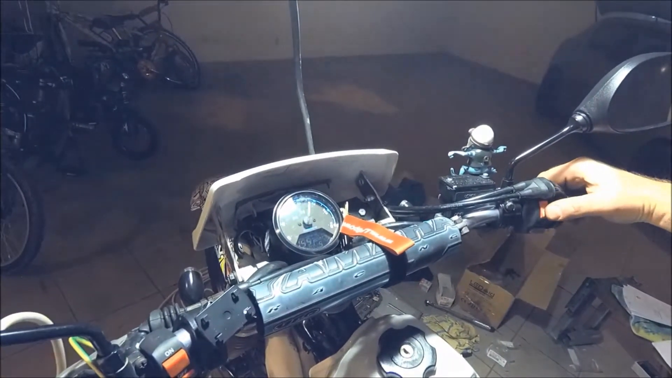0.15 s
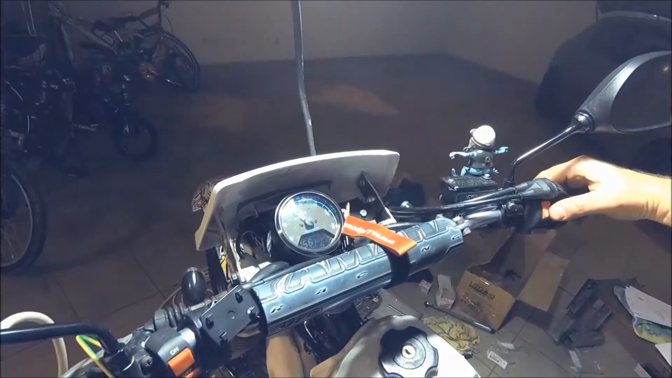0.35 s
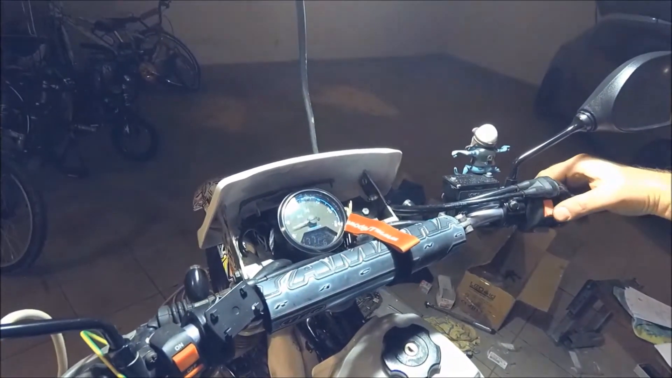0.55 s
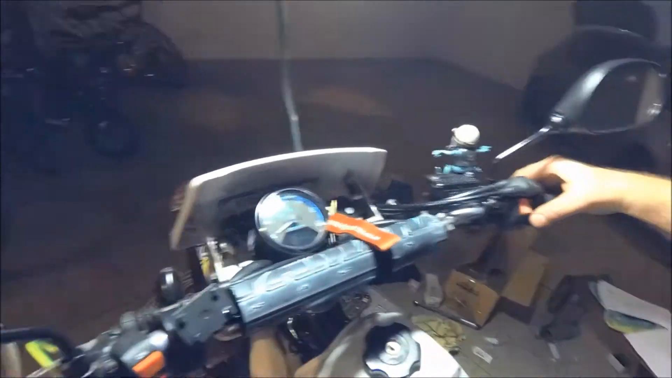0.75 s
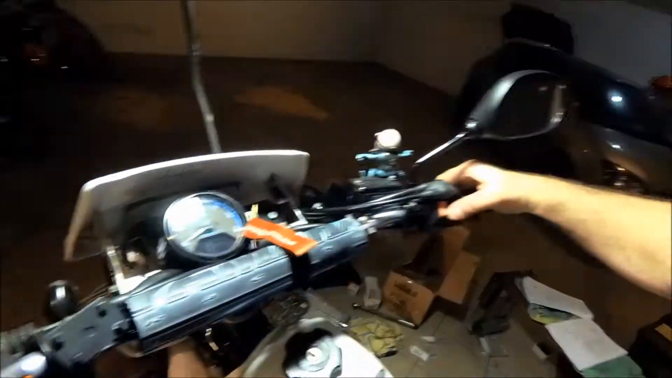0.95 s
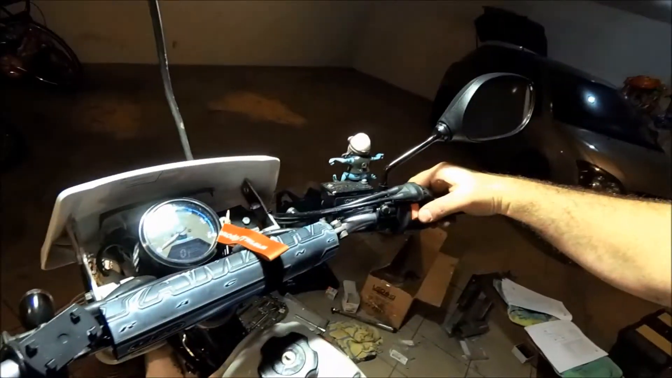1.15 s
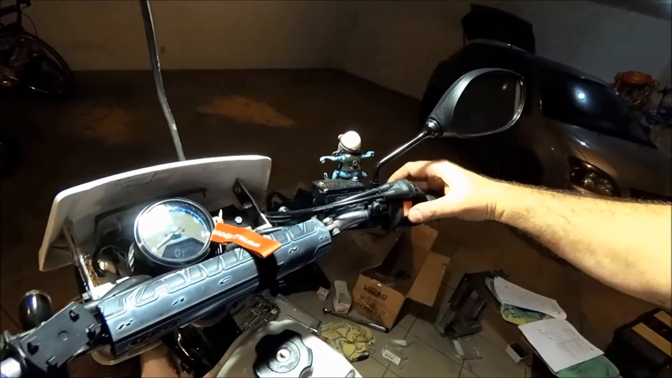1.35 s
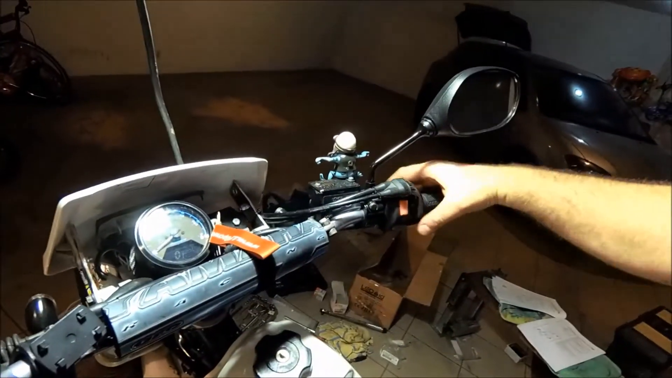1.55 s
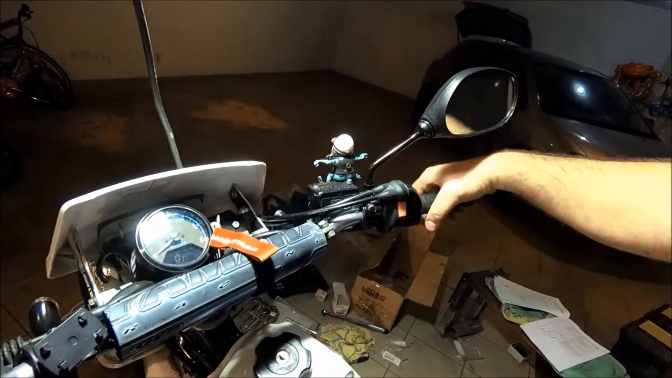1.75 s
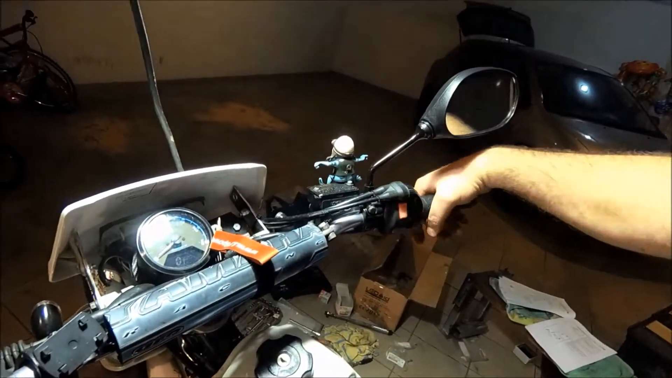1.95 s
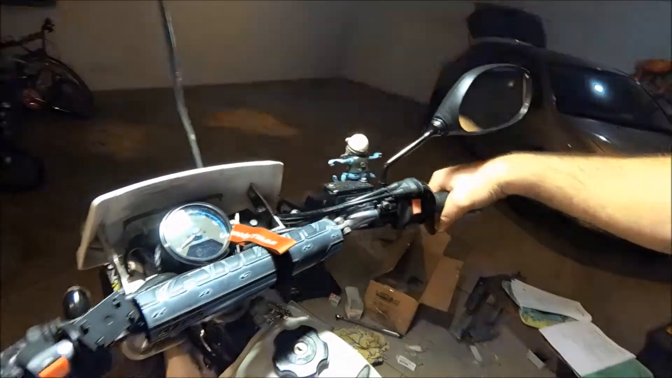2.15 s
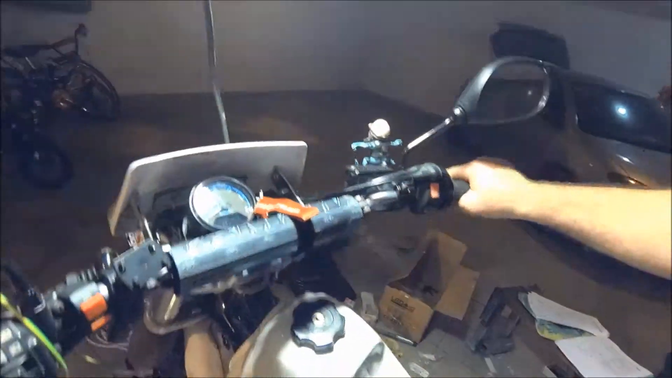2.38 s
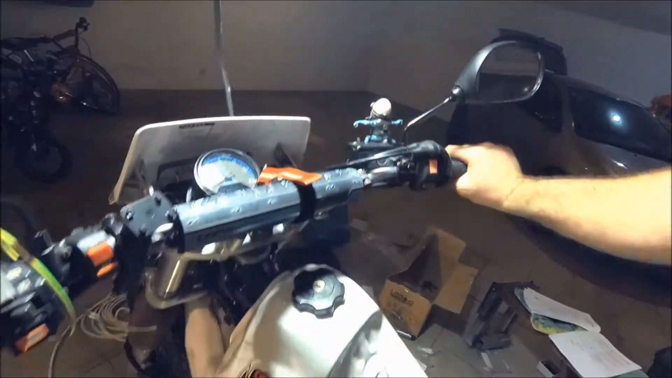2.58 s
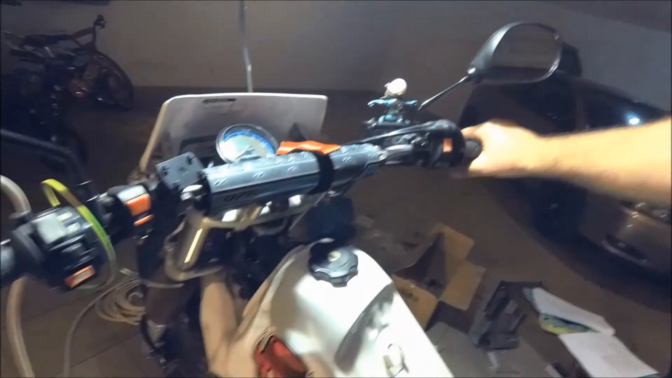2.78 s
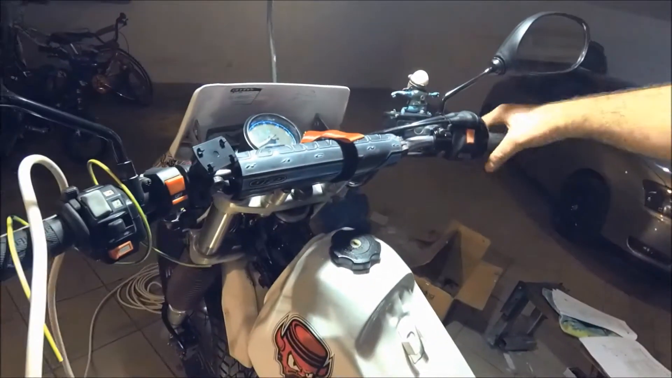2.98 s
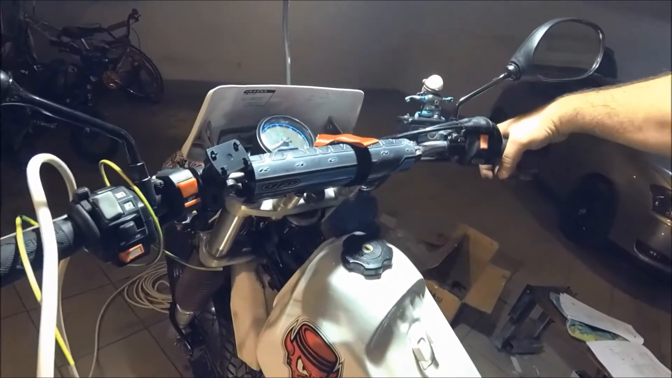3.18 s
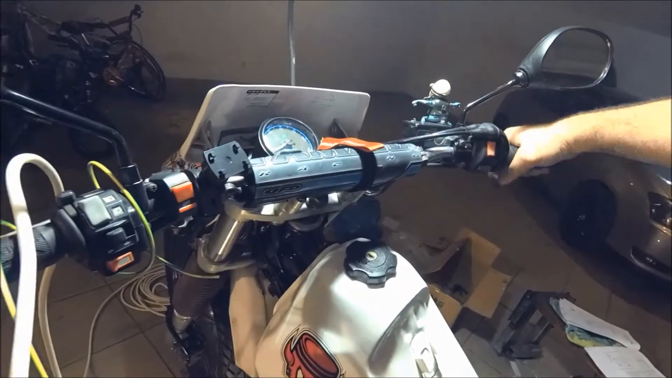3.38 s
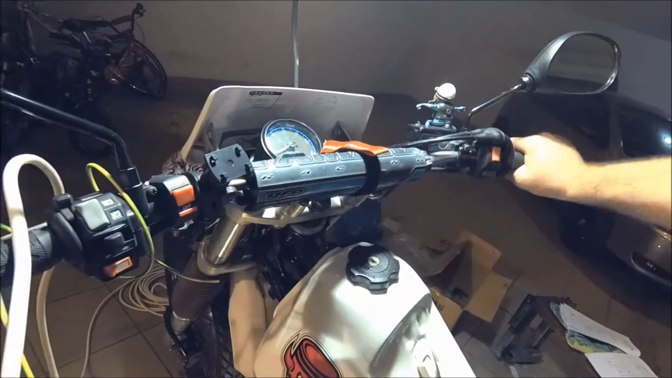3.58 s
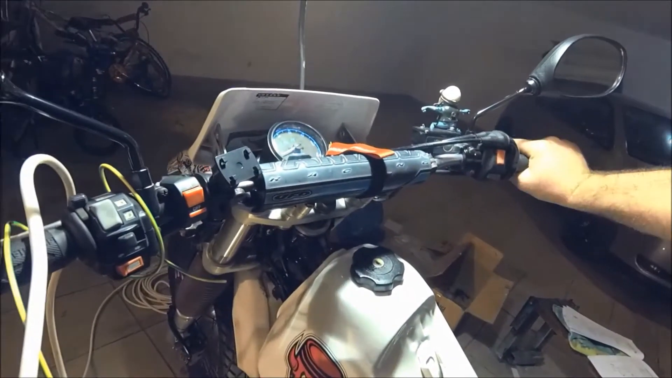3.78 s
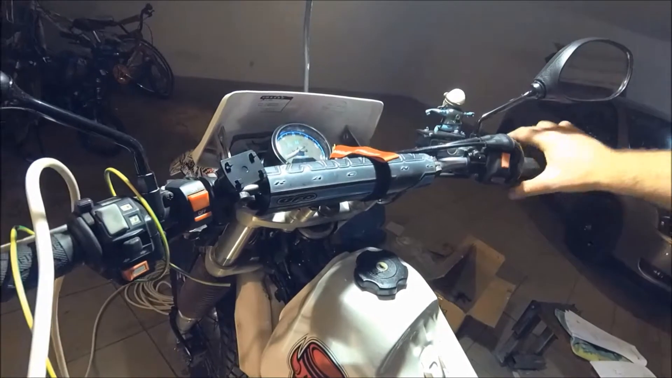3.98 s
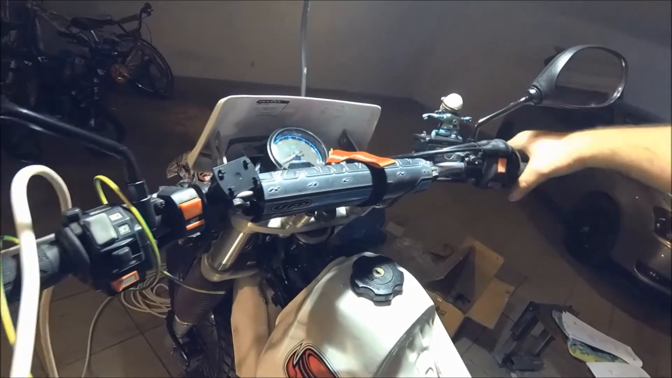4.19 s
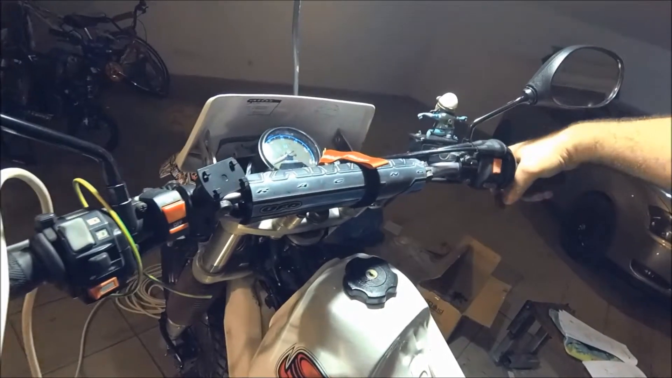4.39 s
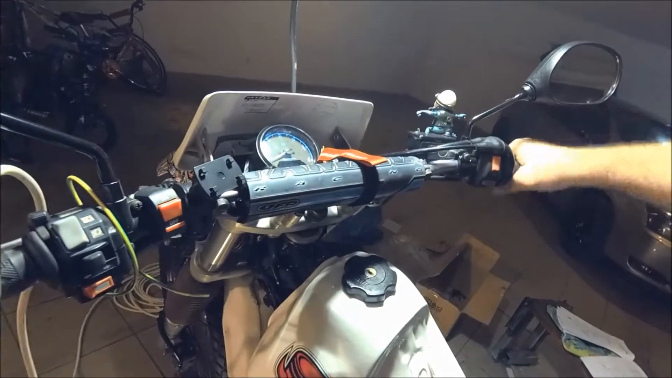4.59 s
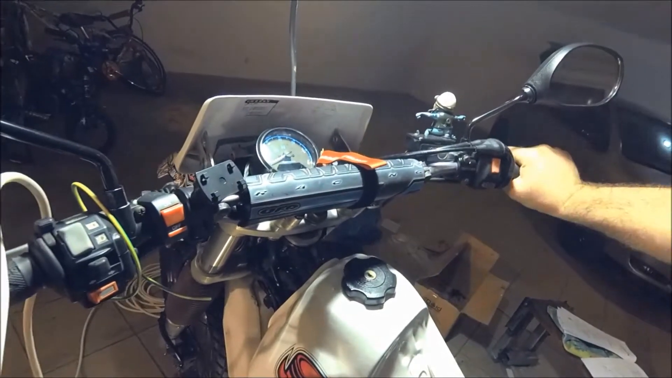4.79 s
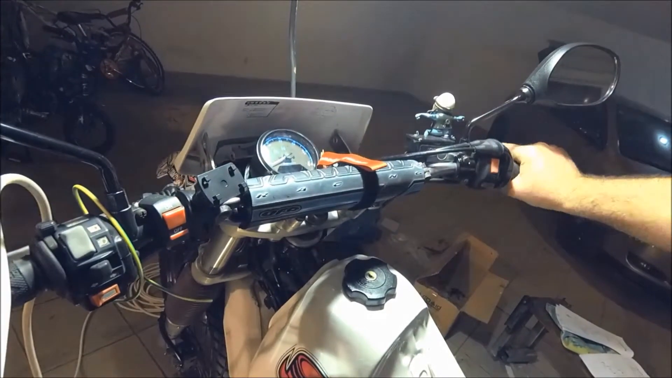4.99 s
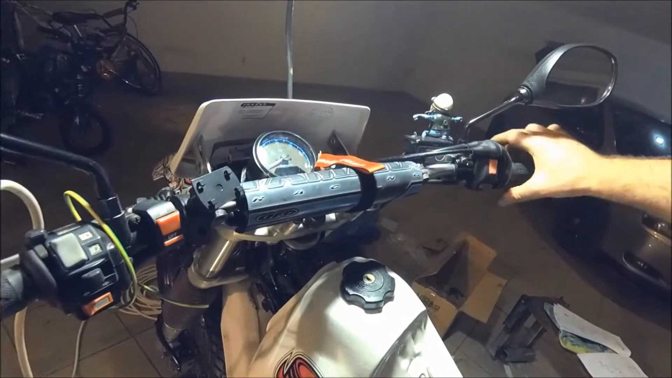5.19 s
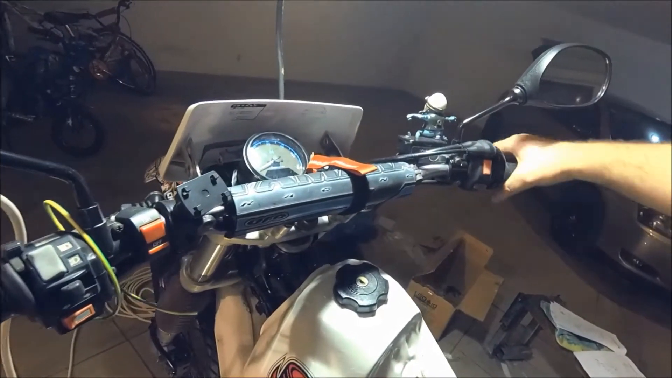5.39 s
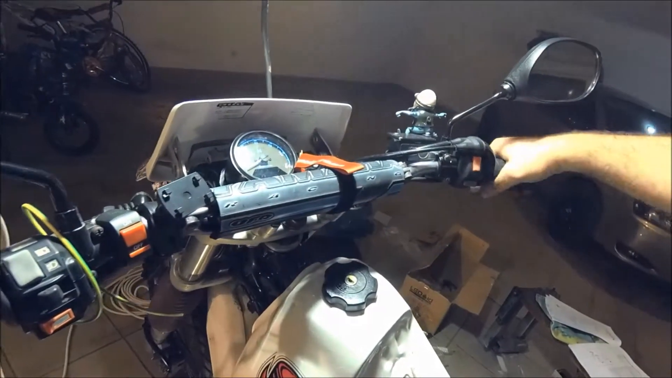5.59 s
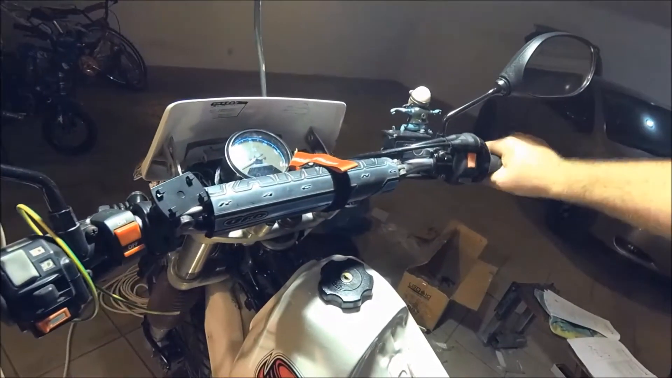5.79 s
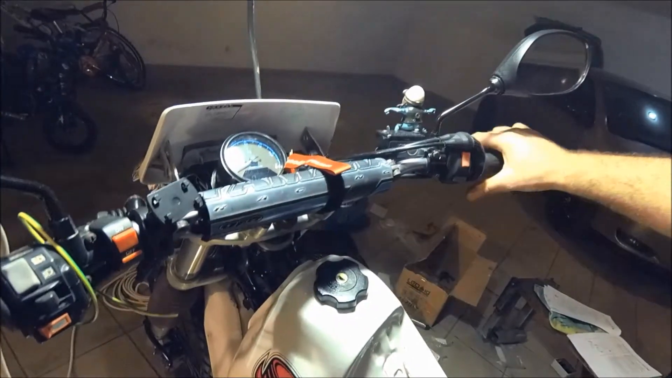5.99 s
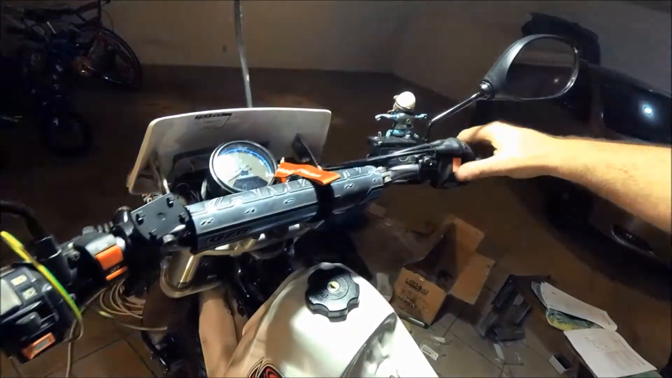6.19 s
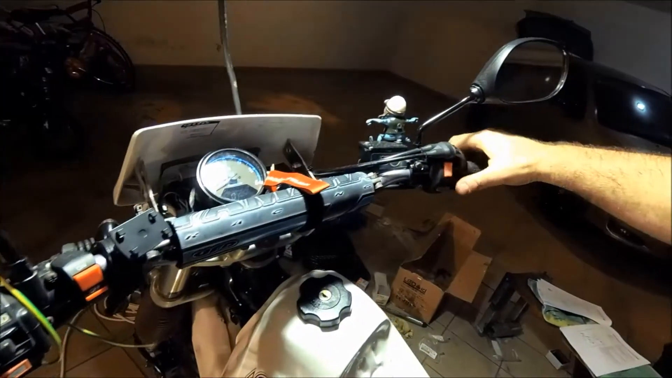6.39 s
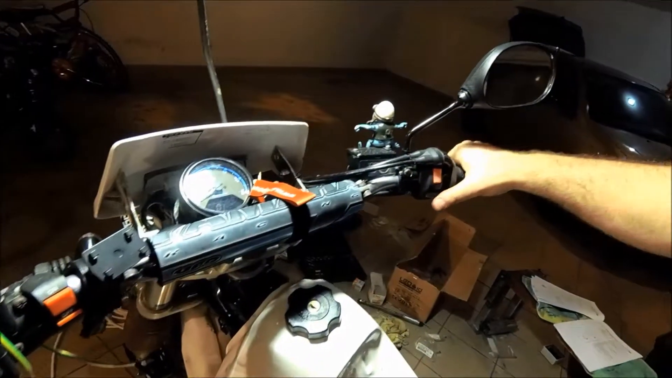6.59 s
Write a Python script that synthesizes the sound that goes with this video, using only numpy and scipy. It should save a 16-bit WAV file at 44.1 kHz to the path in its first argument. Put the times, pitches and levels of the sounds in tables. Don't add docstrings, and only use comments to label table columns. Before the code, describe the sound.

One hard metallic lever snap, then four throttle-grip slams about a second apart, ringing in a bare concrete garage over faint hiss and distant traffic.

```python
import sys
import numpy as np
from scipy import signal
from scipy.fft import rfft, irfft, next_fast_len
from scipy.io import wavfile
from scipy.ndimage import uniform_filter1d, map_coordinates

SR = 44100
rng = np.random.default_rng(int(sys.argv[2]) if len(sys.argv) > 2 else 0)


def invert_db(level):
    return 10 ** (np.asarray(level, dtype=float) / 20)


def materialize(psi):
    bounded = np.clip(np.atleast_2d(psi).T, -1, 1)
    quanta = np.round(bounded * 32767).astype(np.int16)
    wavfile.write(sys.argv[1], SR, quanta)


N = 293286
SPAN, SHORT, BRIEF = SR, SR // 2, SR // 8


def unit(x):
    return x / np.sqrt(np.mean(x ** 2) + 1e-20)


def along(points, hz):
    f, v = np.transpose(points)
    return np.interp(np.log(hz + 1), np.log(f + 1), v)


def curves(rows):
    s, *cols = np.transpose(rows)
    return [np.interp(np.arange(N) / SR, s, c) for c in cols]


def wobble(rate):
    return map_coordinates(rng.standard_normal(200), [np.arange(N) * rate / SR])


def filtered(x, response):
    m = next_fast_len(x.shape[-1] + BRIEF)
    return irfft(rfft(x, m) * response(np.fft.rfftfreq(m, 1 / SR)), m)[..., :x.shape[-1]]


def resonant(x, modes):
    def response(f):
        total = 0
        for k, (centre, width, db) in enumerate(modes):
            damping = 1j * f * width
            total = total + (-1) ** k * invert_db(db) * damping / (centre * centre - f * f + damping)
        return total
    return filtered(x, response)


def paired(two, alike):
    def mixing(hz):
        turn = np.arccos(np.clip(along(alike, hz), -1, 1)) / 2
        return np.array([np.cos(turn), np.sin(turn)])
    mid, side = filtered(two, mixing)
    return np.array([mid + side, mid - side])


def rush(spectrum, alike):
    noise = filtered(rng.standard_normal((2, N)), lambda hz: invert_db(along(spectrum, hz)))
    return unit(paired(noise, alike))


def burst(*contacts):
    shape = np.zeros(BRIEF)
    for delay, db, t60, attack in contacts:
        t = np.maximum(np.arange(BRIEF) / SR - delay, 0)
        shape += invert_db(db - 60 * t / t60) * (1 - np.exp(-t / attack))
    z = rfft(rng.standard_normal(BRIEF) * shape)
    even = irfft(z / np.sqrt(uniform_filter1d(np.abs(z) ** 2, size=9)), BRIEF)
    return even * shape / np.sqrt(np.abs(uniform_filter1d(even ** 2, size=40)) + 1e-12)


def peaked(x, db, tilt_db=0):
    x = filtered(x, lambda hz: invert_db(tilt_db * np.log2((hz + 300) / 5000)))
    return invert_db(db) * x / np.abs(x).max()


# frequency_hz, density_db
HISS = [(12, -58.5), (20, -25), (117, -12), (174, -2), (244, -5), (351, -6.5), (382, -12.5), (415, -8),
        (452, -11.5), (535, -10.5), (689, -15), (1310, -19.5), (3930, -20), (14700, -17.5), (16500, -32)]
# frequency_hz, likeness
HISS_ALIKE = [(60, 0.51), (240, 0.34), (950, -0.17), (3770, -0.22), (15000, 0.054)]


def microphone_hiss():
    return invert_db(-63.5) * rush(HISS, HISS_ALIKE) * invert_db([[-.4], [.4]])


# start_s, level_db
TRAFFIC = [
    (0, -76),
    (1.2, -73.5),
    (1.9, -68.5),
    (2.45, -61.5),
    (2.9, -68.5),
    (3.4, -62.5),
    (4.0, -63.5),
    (4.6, -60.5),
    (5.6, -63.5),
    (6.65, -66.5),
]
# frequency_hz, density_db
RUMBLE = [(30, -20.5), (100, -18), (180, -10), (290, 0), (450, -10), (800, -29), (1500, -57)]
# frequency_hz, density_db
TYRES = [(200, -40), (500, -3.5), (900, -3.5), (1700, -5), (2600, -8.5), (5000, -7), (9000, -29)]


def traffic():
    strength_db, = curves(TRAFFIC)
    rumble = invert_db(strength_db + 1.8 * wobble(12)) * rush(RUMBLE, PORTS)
    tyres = invert_db(-66.5 + 0.81 * (strength_db + 63.5)) * rush(TYRES, PORTS)
    return rumble + tyres


# start_s, drone_hz, level_db
ENGINE = [
    (4.3, 77, -81),
    (4.8, 81.5, -65.5),
    (5.12, 81.4, -76),
    (5.3, 81.3, -68.5),
    (5.75, 84.5, -80.5),
    (6.2, 88.3, -75),
    (6.65, 88.3, -86),
]
# centre_hz, width_hz, level_db
HUM = [(135, 14, -0.5)]


def engine():
    hz, level_db = curves(ENGINE)
    fade = np.clip((np.arange(N) / SR - 4.0) / 0.38, 0, 1)
    phase = 2 * np.pi * np.cumsum(hz + 1.06 * wobble(10)) / SR
    drone = invert_db(level_db + 2.0 + 1.6 * wobble(8)) * np.sin(phase)
    upper = invert_db(-73.5 + 3.3 * wobble(7.1)) * np.sin(1.5 * phase)
    return fade * (drone + resonant(upper, HUM))


def background():
    road = traffic()
    hiss = microphone_hiss()
    return (road + engine()) * invert_db([[-1.2], [1.2]]) + hiss


# frequency_hz, density_db
THUMP = [(150, -34), (300, -3), (600, 0), (1000, -6.5), (1600, -14), (3000, -37)]


def far_thump():
    start_s, level_db, t60_s = 1.8, -62, 1.46
    t = np.maximum(np.arange(N) / SR - start_s, 0)
    envelope = invert_db(level_db - 60 * t / t60_s + 0.93 * wobble(25.6)) * (1 - np.exp(-t / 0.0052))
    return envelope * rush(THUMP, PORTS)


def diffused(x, size=45):
    power = uniform_filter1d(np.abs(rfft(x)) ** 2, size=size)
    return np.roll(irfft(np.sqrt(np.abs(power)), len(x)), 132)


def blurred(x, tilt_db):
    def low_share(hz):
        return 1 / (1 + (hz / 3500) ** 4)
    low = filtered(diffused(x), low_share)
    high = filtered(diffused(x, size=110), lambda hz: 1 - low_share(hz))
    return filtered(low + high, lambda hz: invert_db(tilt_db * np.log2((hz + 300) / 4000)))


# frequency_hz, t60_s
GARAGE = [(150, 1.46), (500, 1.27), (1500, 1.63), (4000, 1.06), (8000, 0.7), (15000, 0.36)]
# frequency_hz, level_db
WET = [(150, -1), (500, -3), (1500, -3), (4000, 1), (8000, -4), (15000, -7.5)]
# frequency_hz, likeness
PORTS = [(60, 0.78), (180, 1), (550, 0.91), (1650, 0.92), (4970, 0.21), (15000, -0.023)]
# frequency_hz, left_minus_right_db
SHADOW = [(200, -3), (2000, -4.5), (8000, -3), (11000, -3), (14500, 6)]


def add(out, s, dry, pan_db=0, wet_db=0, size=SPAN, walls=np.asarray):
    hz, t, z = signal.stft(rng.standard_normal((2, size)), SR, nperseg=256)
    fade = invert_db(-60 * t / along(GARAGE, hz)[:, None])
    fade = fade / np.linalg.norm(fade, axis=1)[:, None]
    fade = fade * invert_db(along(WET, hz) + wet_db)[:, None]
    tail = signal.istft(z * fade, SR, nperseg=256)[1] / np.sqrt(128)
    onset = 1 - np.exp(-np.arange(tail.shape[1]) / SR / 0.0013)
    tail = paired(tail * onset, PORTS) * invert_db([[-1], [1]])
    sound = signal.fftconvolve(walls(dry)[None], tail, axes=1)
    side = np.array([[.5], [-.5]])
    direct = filtered(dry, lambda f: invert_db(side * (along(SHADOW, f) + pan_db)) * np.exp(side * 1j * f / 9000))
    sound[:, :len(dry)] += direct
    start = round(s * SR)
    out[:, start:start + sound.shape[1]] += sound


# start_s, peak_db, centre_hz
TAPS = [
    (0.081, -47.5, 150),
    (0.844, -44, 918),
    (2.676, -49, 288),
    (2.678, -50.5, 620),
    (2.808, -61, 320),
    (2.868, -59, 234),
    (3.571, -53, 304),
    (5.889, -49.5, 318),
]


def knocks(out):
    for s, db, hz in TAPS:
        knock = resonant(burst((0, 0, 0.0176, .001)), [(hz, 0.2 * hz, 0)])
        knock = resonant(knock, [(hz, 0.68 * hz, 0)])
        add(out, s, peaked(knock, db - 2), wet_db=-7.5, size=BRIEF)


# start_s, peak_db, centre_hz
TICKS = [
    (2.886, -46, 12100),
    (3.601, -51, 12500),
    (3.608, -52.5, 5930),
    (4.035, -49, 13500),
    (4.728, -52, 6100),
    (5.904, -45.5, 13200),
    (5.912, -52.5, 5800),
]


def cable_ticks(out):
    for s, db, hz in TICKS:
        tick = resonant(burst((0, 0, 200 / hz, .0015)), [(hz, 0.24 * hz, 0)])
        add(out, s, peaked(tick, db), wet_db=3, size=BRIEF)


# start_s, peak_db, left_minus_right_db
LEVER = [
    (1.376, -44, -12),
    (1.3879, -6.5, -5.5),
]
# centre_hz, width_hz, level_db
LEVER_BODY = [(546, 550, -25), (1110, 220, -15.5), (1643, 148, 0), (1870, 175, -0.5), (2800, 310, -9.5),
              (3324, 220, -9), (4200, 400, -3.5), (4790, 350, -4.5), (5890, 280, -3), (7580, 540, -3),
              (8340, 780, -3), (10830, 490, -6), (12160, 380, -2), (13760, 1300, -7), (15500, 380, -1)]


def lever(out):
    for s, db, pan_db in LEVER:
        snap = resonant(burst((0.00026, 0, .006, .002)), LEVER_BODY)
        snap = peaked(snap, db, tilt_db=1)
        add(out, s, snap, pan_db + 4.0, wet_db=-2.5, walls=lambda x: blurred(x, -2.9))


def boom(out, s, db, modes, wet_db, t60):
    add(out, s + .003, peaked(resonant(burst((0, 0, t60, .003)), modes), db), wet_db=wet_db)


# start_s, peak_db, brightness_db_per_octave
STOPS = [
    (2.601, -41.5, -4.5),
    (3.731, -33.5, 1),
    (4.858, -30, 1.5),
]
# centre_hz, width_hz, level_db
END_STOP = [(1470, 220, 3.5), (2000, 510, -5), (5120, 1500, -6.5), (6750, 390, 1.5), (7570, 410, 0),
            (9250, 800, -2.5), (13500, 3400, -6)]
# centre_hz, width_hz, level_db
BARS = [(237.5, 15, 0.5), (280, 18, -2), (312, 27, -9.5)]


def throttle_stops(out):
    for s, db, tilt_db in STOPS:
        click = resonant(burst((0, 0, 0.035, 0.00028)), END_STOP)
        add(out, s, peaked(click, db, tilt_db), wet_db=0.8, size=SHORT, walls=diffused)
        boom(out, s, -45, BARS, wet_db=-2.5, t60=0.013)


# frequency_hz, level_db, t60_s
RING = [(180.6, -7, 0.23), (210.8, -6, 0.42), (277, -3, 0.81), (343.3, -11.5, 0.57), (464.5, -8.5, 0.22),
        (1483, -12, 0.45), (1567, -16, 0.45), (1705, -7.5, 0.66), (1853, -11, .3), (1903, -11, 0.29),
        (2051, -12.5, .7), (2460, -10.5, .25), (3720, -8.5, 0.55), (4554, -14, 0.23)]


def ringing(out):
    t = np.arange(SHORT) / SR
    envelope = (1 - np.exp(-t / .008)) * (1 - t / t[-1])
    for s, slam_db, *_ in SLAMS:
        ring = np.zeros(SHORT)
        for hz, level, t60 in RING:
            strength, phase = rng.standard_normal(2)
            ring += invert_db(level + 2.5 * strength - 60 * t / t60) * np.sin(2 * np.pi * hz * t + 3 * phase)
        add(out, s, invert_db(slam_db - 29) * ring * envelope, wet_db=-8, size=SHORT)


# centre_hz, width_hz, level_db
CABLE = [(1120, 220, -3.5), (1570, 240, 1), (1810, 280, -1), (3800, 2400, -14)]


def cable_return(out, s, slam_db):
    lead = np.arange(BRIEF // 2) / SR
    stroke = np.clip((lead - .002) / 0.031, 0, 1) * invert_db(60 * lead)
    whir = unit(resonant(rng.standard_normal(len(lead)), CABLE)) * stroke
    add(out, s - lead[-1], invert_db(slam_db - 46.5) * whir, size=SHORT)
    flick = resonant(burst((0, 0, 0.034, .001)), [(13500, 6300, 0)])
    flick = resonant(flick, [(13500, 8200, 0)])
    add(out, s - .015, peaked(flick, slam_db - 23), size=BRIEF)


# start_s, peak_db, bounce_delay_s, brightness_db_per_octave
SLAMS = [
    (3.0026, -12, 0.0066, 1.5),
    (4.1005, -13, 0.0071, 1.5),
    (5.237, -13, .0043, 1.5),
    (6.1606, -16, 0.0047, 0.57),
]
# centre_hz, width_hz, level_db
HOUSING = [(1084, 100, -7), (1505, 113, -3.5), (1730, 80, -2.5), (1902, 183, -2), (3880, 950, -10),
           (4810, 540, -10), (6020, 690, -8.5), (7250, 390, -6), (9570, 410, -3.5), (10100, 76, -3),
           (11000, 800, -10), (12000, 410, -7.5), (13370, 250, 0.5), (13505, 127, 4), (14000, 345, 3.5),
           (15330, 250, -2)]
# frequency_hz, level_db
HAND = [(1900, 0.5), (2600, -2.5), (4500, -1), (7000, -1)]
# centre_hz, width_hz, level_db
FRAME = [(32, 21, -28), (174.3, 24, -3), (213.3, 22.6, -1), (273.4, 28.6, -2.5), (348, 27, -9),
         (448, 62, -8.5), (636, 64, -10), (848, 122, -15)]


def throttle_slams(out):
    for s, db, bounce_s, tilt_db in SLAMS:
        cable_return(out, s, db)
        blows = burst((0, 0, .016, .0003), (bounce_s, -8, .04, .001), (0.033, -16.5, .05, .002))
        slam = peaked(resonant(blows, HOUSING), db, tilt_db)
        shaded = filtered(slam, lambda hz: invert_db(along(HAND, hz)))
        add(out, s, shaded, wet_db=0.03, walls=lambda _: blurred(slam, tilt_db=-0.4))
        boom(out, s, db - 24.5, FRAME, wet_db=7, t60=0.027)


def scene():
    out = np.zeros((2, N + 2 * SPAN))
    for source in (lever, throttle_slams, throttle_stops, cable_ticks, knocks, ringing):
        source(out)
    return out[:, :N] + background() + far_thump()


def low_pass(x):
    return signal.sosfilt(signal.butter(12, 16620, fs=SR, output="sos"), x)


def record(dry):
    top_hz = 15300
    mix = filtered(dry, lambda hz: invert_db(-15 * np.clip((hz - top_hz + 200) / 450, 0, 1)))
    return low_pass(mix)


dry = scene()
out = record(dry)
materialize(out)
```